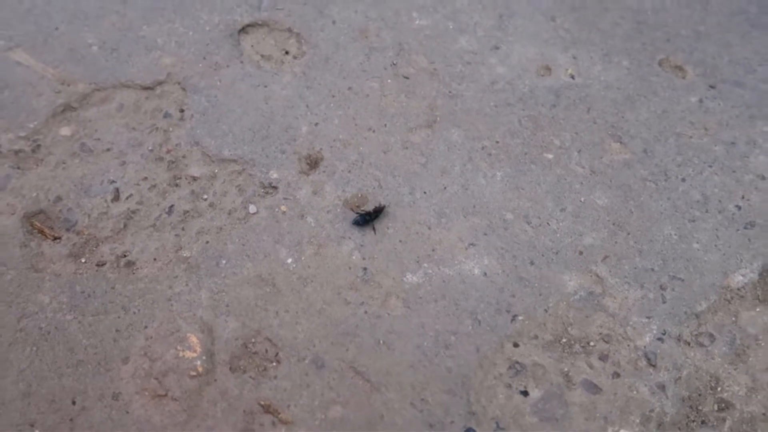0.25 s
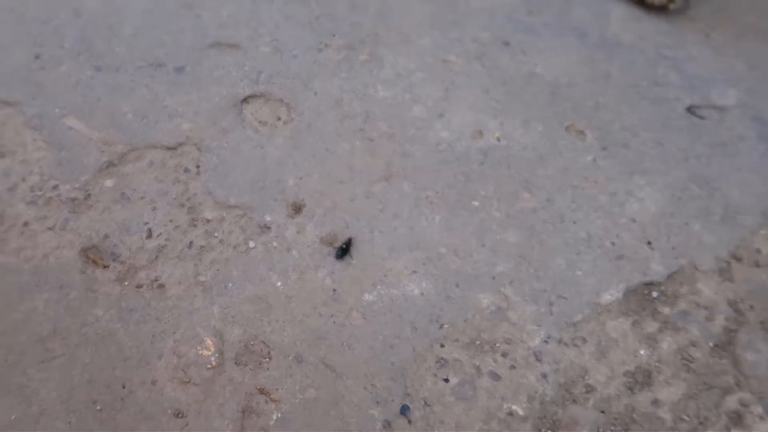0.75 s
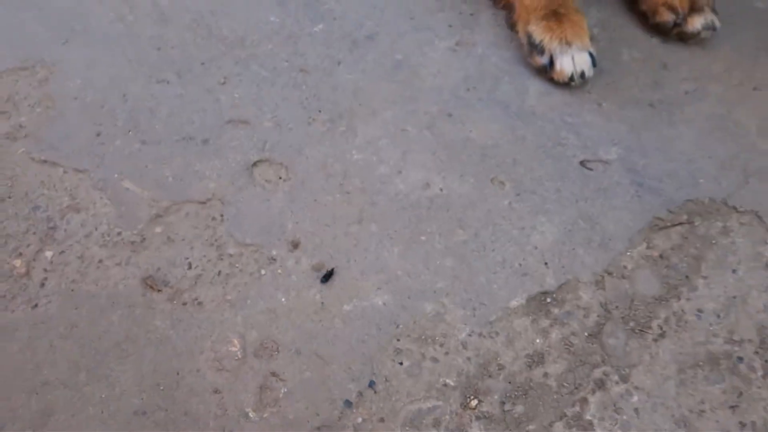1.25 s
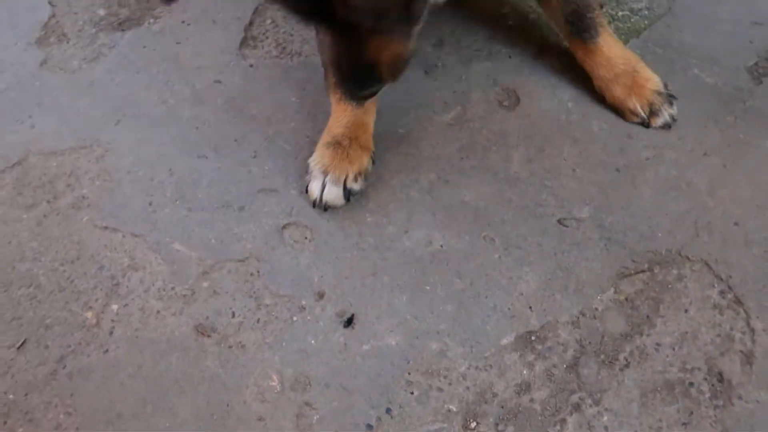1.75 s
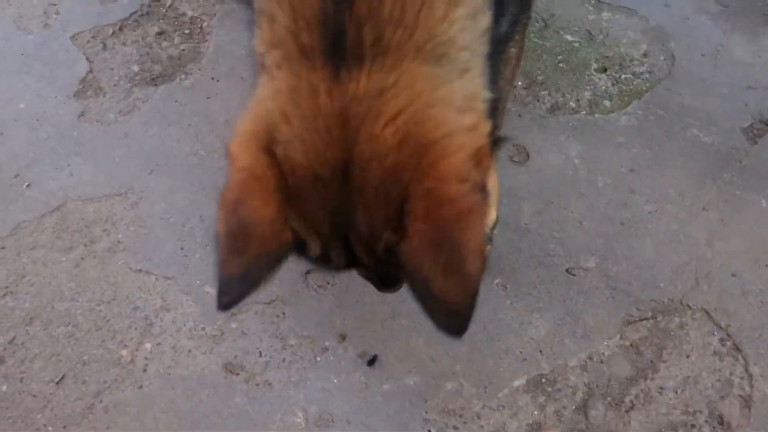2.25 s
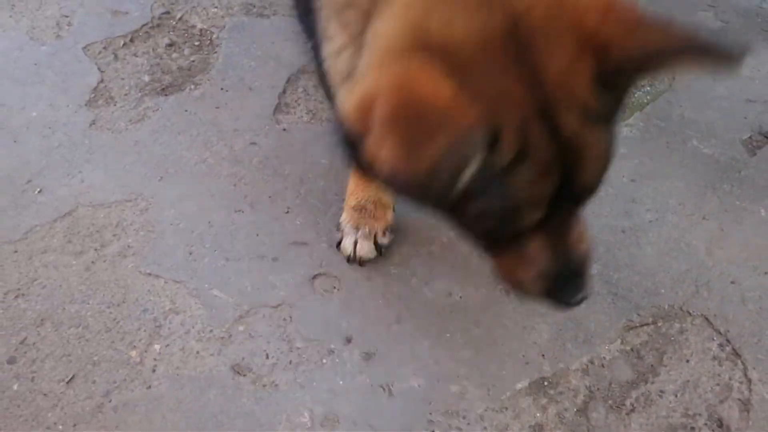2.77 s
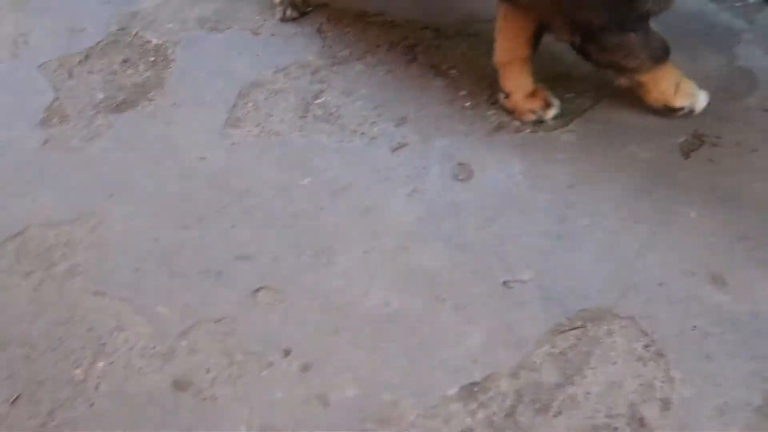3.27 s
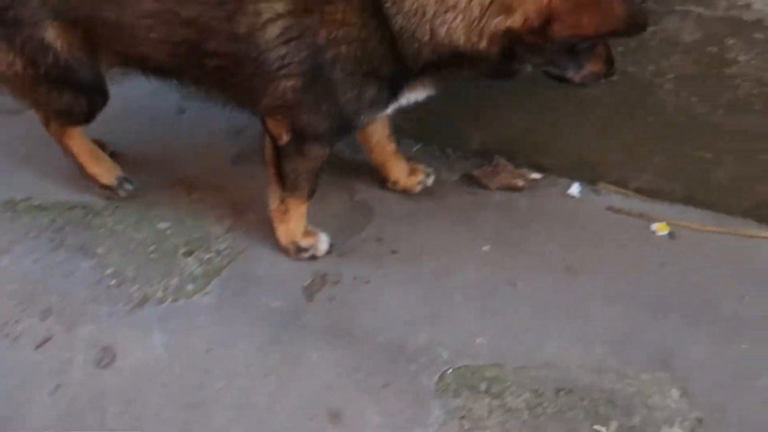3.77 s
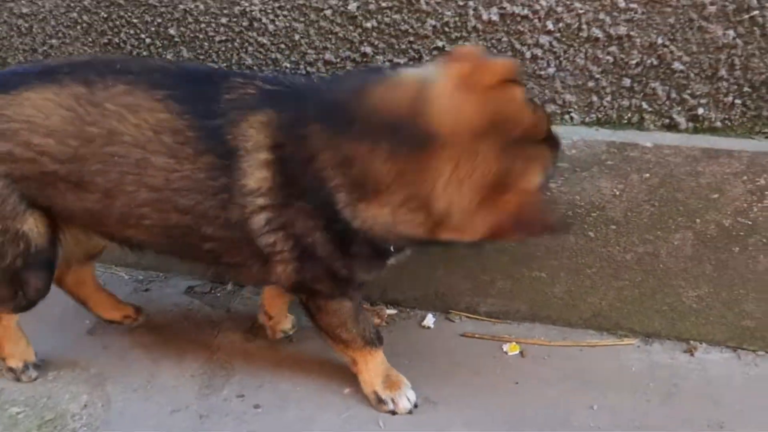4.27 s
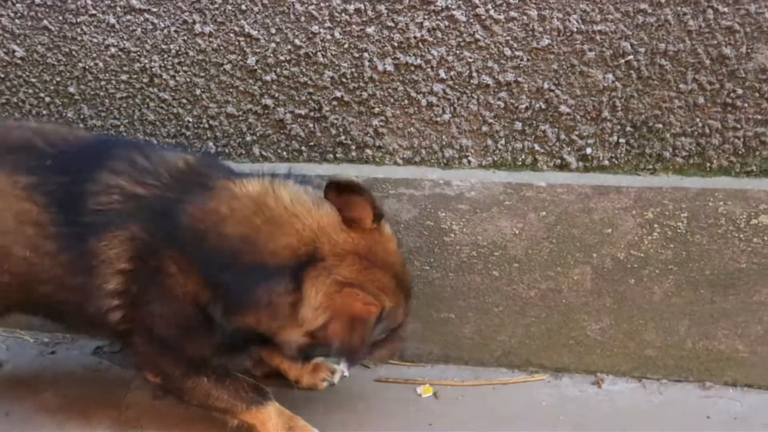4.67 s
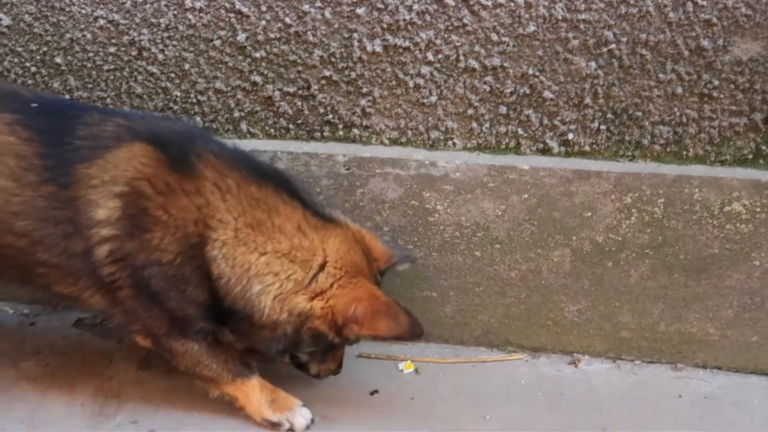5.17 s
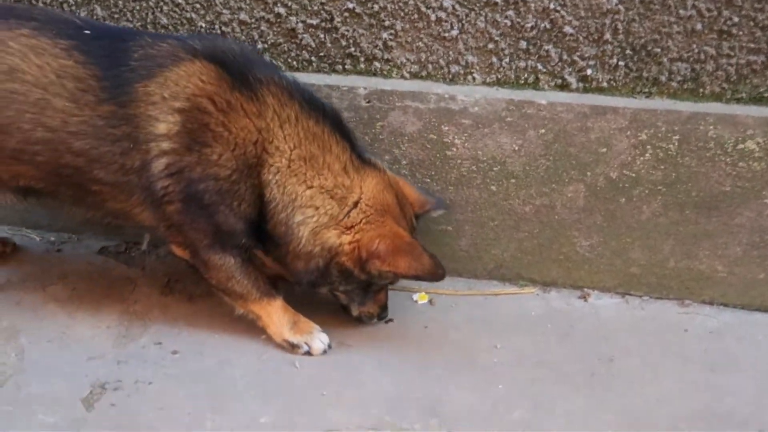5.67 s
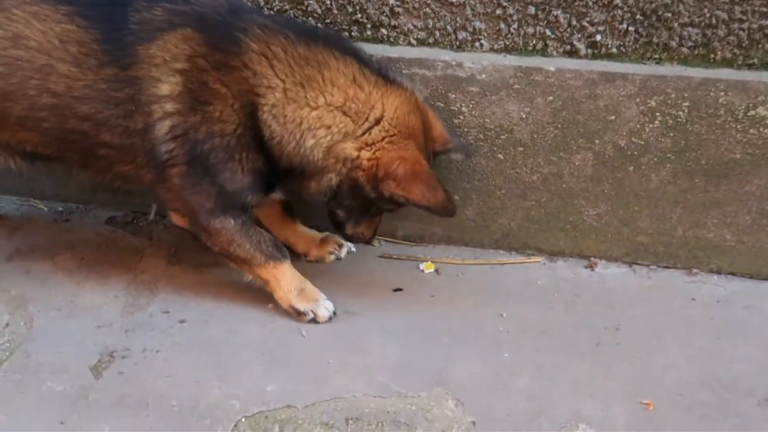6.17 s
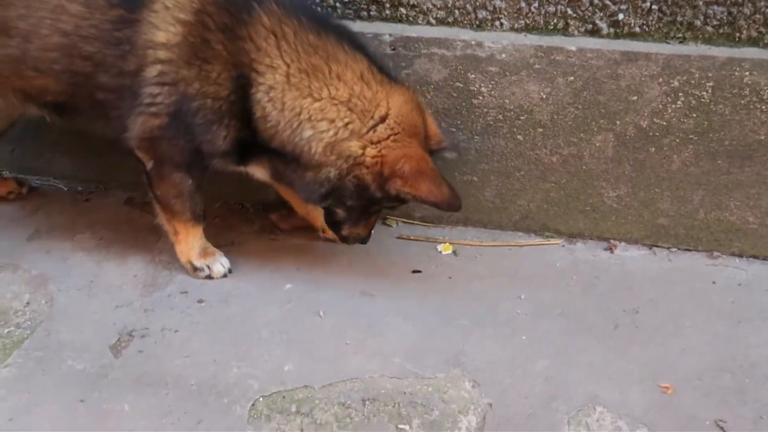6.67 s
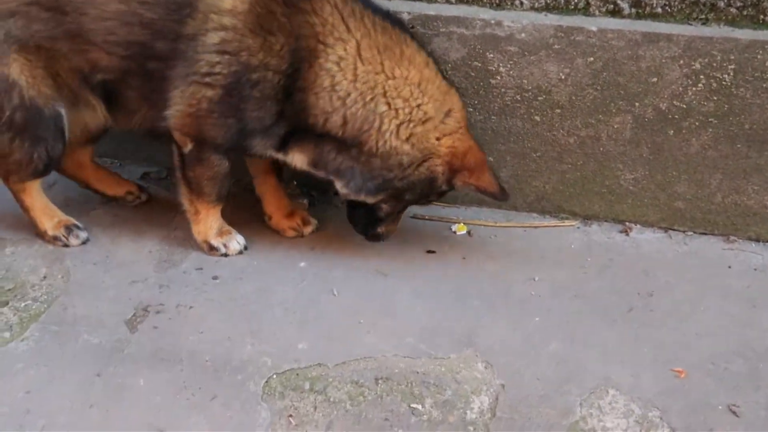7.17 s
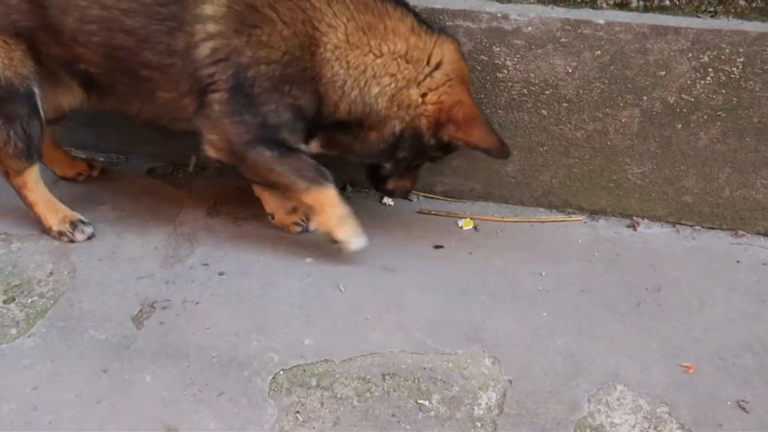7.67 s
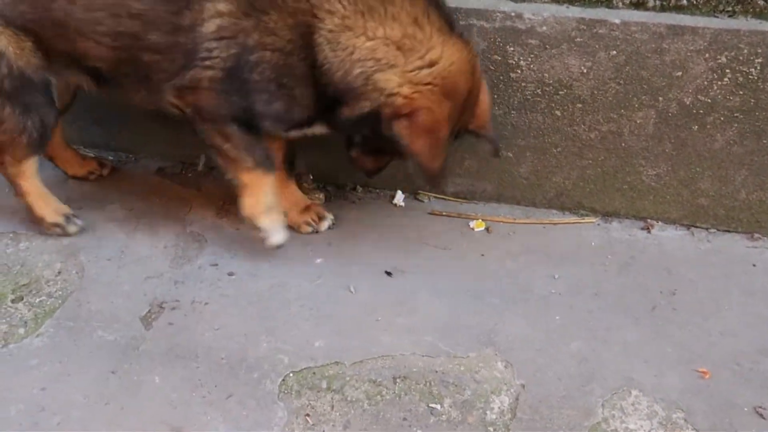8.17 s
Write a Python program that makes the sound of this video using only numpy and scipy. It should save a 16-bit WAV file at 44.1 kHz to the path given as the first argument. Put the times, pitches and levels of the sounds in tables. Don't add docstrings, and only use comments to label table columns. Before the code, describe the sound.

Steady distant traffic hum and lumpy low wind sit under a puppy's rattling, closed-mouthed grunts with a nasal snort, each about a fifth of a second. Small birds chirp from the walls around, mostly right, one whistling down at left. Light paw scuffs and claw clicks lead to a sharp clatter halfway, then quieter grunts, taps and a short scraping drag, all near and slightly echoing.

```python
import sys
import numpy as np
from scipy import signal
from scipy.fft import rfft, irfft, next_fast_len
from scipy.io import wavfile
from scipy.ndimage import uniform_filter1d, map_coordinates

SR = 44100
rng = np.random.default_rng(int(sys.argv[2]) if len(sys.argv) > 2 else 0)


def wav_out(sig):
    wavfile.write(sys.argv[1], SR, np.round(np.clip(np.atleast_2d(sig).T, -1, 1) * 32767).astype(np.int16))


def elevation(decibels):
    levels = np.asarray(decibels, float)
    return 10 ** (levels / 20)


N = 371763


def unit(x):
    return x / np.sqrt(np.mean(x ** 2) + 1e-20)


def along(points, hz):
    f, v = np.transpose(points)
    return np.interp(np.log(hz + 1), np.log(f + 1), v)


def wobble(rate):
    knots = rng.standard_normal(int(N * rate / SR) + 4)
    return map_coordinates(knots, [np.arange(N) * rate / SR])


def filtered(x, response):
    m = next_fast_len(N + SR // 2)
    return irfft(rfft(x, m) * response(np.fft.rfftfreq(m, 1 / SR)), m)[..., :N]


def resonant(x, modes):
    def response(f):
        total = 0
        for k, (centre, width, db) in enumerate(modes):
            damping = 1j * f * width
            total = total + (-1) ** k * elevation(db) * damping / (centre ** 2 - f ** 2 + damping)
        return total
    return filtered(x, response)


def gliding(x, centre_hz, width_hz):
    turn = np.exp(2j * np.pi * np.cumsum(centre_hz) / SR)
    keep = np.exp(-np.pi * width_hz / SR)
    return unit((signal.lfilter([1], np.poly([keep] * 3), x / turn) * turn).real)


def arch(u, peak, start_db, end_db, round_):
    rise = start_db * abs(1 - u / peak) ** round_
    fall = end_db * abs((u - peak) / (1 - peak)) ** round_
    return -np.where(u < peak, rise, fall)


def rush(spectrum, alike, patchy_db):
    z = signal.stft(rng.standard_normal((2, N)), nperseg=512)[2]
    field = uniform_filter1d(rng.standard_normal(z.shape[1:]), 6, 0)
    field = uniform_filter1d(field, 14, 1)
    pair = signal.istft(z * elevation(patchy_db * unit(field)), nperseg=512)[1][:, :N]

    def response(hz):
        angle = np.arccos(np.clip(along(alike, hz), -1, 1)) / 2
        return elevation(along(spectrum, hz)) * [np.cos(angle), np.sin(angle)]
    mid, side = filtered(pair, response)
    return unit(np.array([mid + side, mid - side]))


def placed(x, pan_db, lag_s):
    half = np.array([[.5], [-.5]])
    return filtered(x, lambda hz: elevation(pan_db * half) * np.exp(-2j * np.pi * hz * lag_s * half))


def yard(x, shared_hz):
    # pitch_hz, die_s
    echo_times = [(100, 0.435), (1000, 0.22), (2500, 0.3294), (12000, 0.317)]
    hz, t, z = signal.stft(rng.standard_normal((2, SR // 3)), SR, nperseg=256)
    z[1] += np.exp(-hz[:, None] / shared_hz) * (z[0] - z[1])
    tail = signal.istft(z * elevation(-60 * t / along(echo_times, hz)[:, None]), SR, nperseg=256)[1]
    tail = tail / np.linalg.norm(tail, axis=1)[:, None]
    late = np.pad(x, (250, 0))[None]
    return signal.oaconvolve(late, tail, axes=1)[:, :N]


def air():
    # peak_s, level_db, time to die by 20 dB die_s
    gust_rows = [(.09, -38.5, 0.27), (.77, -37, 0.37), (1.1, -41, 0.86), (2.49, -45.5, 1.17),
                 (3.22, -45.5, 0.06), (3.54, -33.5, 0.31), (4.18, -41.5, 0.83), (6.29, -52.5, 1.95),
                 (6.64, -42, 0.04), (7.5, -45, 0.5), (7.63, -37.5, 0.42), (8.3, -60.5, -2)]
    # pitch_hz, level_db
    push = [(8, -28), (20, -14.5), (35, 6), (48, 11), (65, -6), (100, -14.5), (200, -71)]
    # pitch_hz, level_db (per Hz)
    hum_curve = [(24, -61.5), (40, -3), (66, -1.5), (179, -9.5), (241, -7), (903, -18.5), (1220, -19),
                 (2060, -23.5), (2840, -23), (9410, -38), (11500, -39.5), (13700, -45.5), (15500, -50)]
    # pitch_hz, likeness (0 to 1)
    likeness = [(50, 1), (150, 0.816), (500, 0.468), (1200, 0.18), (3000, 0.037), (8000, 0.056),
                (15000, 0.39)]
    calm_db, rise_s = -52.5, 0.105
    t = np.arange(N) / SR
    wind = elevation(calm_db)
    for peak, db, dies in gust_rows:
        wind = wind + elevation(db - 20 * np.maximum((peak - t) / rise_s, (t - peak) / dies))
    hum = elevation(-48.5) * elevation(.6 * wobble(3)) * rush(hum_curve, likeness, patchy_db=1.1)
    lumps = elevation(0.77 * wobble(11.0)) * rush(push, [(30, .96)], patchy_db=0.9)
    return hum + elevation(-4.0) * wind * unit(lumps)


def birds(notes, swing_hz):
    out = np.zeros(N + SR)
    pace_hz = 380 + 160 * unit(wobble(70))
    flutter = .7 * np.sin(2 * np.pi * np.cumsum(pace_hz) / SR) + .28 * unit(wobble(300))
    hoarse_db = 4 * wobble(120)
    for s, length, from_hz, to_hz, db in notes:
        at = round(s * SR)
        u = np.arange(int(length * SR)) / (length * SR)
        glide = from_hz + (to_hz - from_hz) * u ** .8
        phase = 2 * np.pi * np.cumsum(glide + swing_hz * flutter[at:][:len(u)]) / SR
        swell = elevation(db + 3 + hoarse_db[at:][:len(u)]) * np.sin(np.pi * u ** 0.52) ** 0.582
        octave = elevation(-10.5 - 0.0261 * np.abs(glide - 3000))
        out[at:][:len(u)] += swell * (np.sin(phase) + octave * np.sin(phase / 2))
    return out[:N]


def sparrows():
    # start_s, length_s, from_hz, to_hz, level_db
    hoarse = [(0, 0.0453, 2230, 2449, -43.5), (0, 0.0546, 4090, 3329, -44.5),
              (.105, 0.0448, 2297, 3007, -45), (.17, 0.096, 2829, 2524, -50), (1.16, 0.06, 4880, 4510, -57),
              (1.19, 0.0985, 4100, 3634, -50.5), (1.42, 0.129, 2682, 2500, -55),
              (1.47, 0.0603, 4676, 3944, -55.5), (1.51, 0.083, 3171, 2846, -48.5),
              (1.858, 0.0486, 4622, 4140, -41), (1.92, 0.0593, 4122, 3610, -46),
              (2.14, 0.0513, 4490, 3495, -48), (2.265, 0.0275, 2697, 2681, -49),
              (2.19, 0.104, 2950, 2567, -56.5), (2.385, 0.065, 3500, 3124, -57.5),
              (2.43, 0.0534, 2910, 2626, -54.5), (3.28, 0.036, 3358, 3037, -59),
              (3.635, 0.0402, 3105, 3586, -44.5), (3.665, 0.0666, 3501, 2719, -44),
              (5.43, 0.0442, 4110, 3460, -37), (5.6, 0.08, 4365, 3940, -54), (6.28, 0.048, 3286, 2979, -61),
              (6.42, 0.068, 4516, 3914, -46), (6.8, 0.0894, 1580, 1350, -63),
              (.03, 0.13, 4265, 3267, -62.5), (1.17, .08, 5290, 4240, -61), (6.79, 0.134, 3200, 2975, -56),
              (6.93, 0.065, 3274, 3018, -53.5), (8.352, 0.049, 4138, 3486, -51.5),
              (8.355, 0.038, 3120, 2830, -52), (8.342, 0.0358, 2198, 1693, -53.5),
              (1.27, 0.056, 4430, 3484, -56), (2.895, 0.0301, 3685, 3267, -60),
              (2.25, 0.038, 4200, 3705, -59.5), (.16, 0.096, 3690, 3426, -60),
              (2.15, .04, 2292, 2072, -52.5)]
    # start_s, length_s, from_hz, to_hz, level_db
    clear = [(.108, 0.029, 4140, 4896, -52), (1.105, 0.095, 2790, 2607, -60),
             (7.21, 0.0725, 3130, 2790, -63.5), (1.26, 0.0306, 2876, 2704, -54),
             (1.98, 0.057, 3406, 2760, -54), (5.35, 0.046, 2590, 2742, -62), (3.07, 0.047, 3280, 2846, -61),
             (5.01, 0.0236, 3425, 2798, -54), (5.19, 0.062, 3495, 2694, -62),
             (5.378, 0.0387, 3500, 4223, -46.5), (5.4, 0.0342, 4595, 5370, -43),
             (5.428, 0.0144, 5210, 3598, -48.5), (5.48, 0.0263, 3254, 3107, -43.5),
             (1.895, 0.067, 3585, 3510, -44), (2.15, 0.069, 3495, 2646, -49.5),
             (5.63, 0.0904, 3315, 2411, -45), (6.11, 0.05803, 3520, 2601, -64),
             (6.36, 0.034, 4150, 4045, -50.5), (6.385, 0.044, 5300, 4344, -45),
             (6.77, 0.085, 4470, 3850, -56.5), (7.98, 0.0363, 3508, 2806, -58),
             (8.18, 0.041, 3618, 2865, -56.5)]
    # start_s, length_s, from_hz, to_hz, level_db
    thin = [
        (1.4, 0.097, 3100, 3390, -60.5),
        (1.41, 0.087, 4400, 4400, -61),
        (3.465, .035, 3200, 2950, -69),
        (5.93, 0.0395, 3020, 2900, -60.5),
        (6.845, 0.083, 3500, 3434, -55),
        (6.835, 0.0699, 2850, 2607, -53.5),
        (6.49, 0.0522, 3100, 2700, -61.5),
    ]
    return birds(hoarse, swing_hz=477.6) + birds(clear, swing_hz=264) + birds(thin, swing_hz=90)


def grunts():
    # start_s, length_s, effort_db, pulse_hz, nose_db
    grunt_rows = [(0.027, 0.2157, -36.5, 55.73, -47.5), (0.589, 0.2374, -32, 43.03, -35),
                  (1.051, 0.2178, -33.5, 40.12, -39), (1.496, 0.267, -35, 37.43, -47),
                  (2.391, 0.221, -33, 39.5, -43), (2.617, 0.186, -40.5, 36.59, -51.5),
                  (2.821, 0.1896, -35, 41.53, -46), (3.158, 0.1655, -35.5, 37.82, -47.5),
                  (3.463, 0.2047, -34, 40.72, -42.5), (3.758, 0.1715, -39.5, 40.02, -49.5),
                  (4.152, 0.1836, -38, 37.06, -51.5), (5.101, 0.276, -38, 37.29, -53.5),
                  (5.75, 0.244, -43.5, 36.47, -63.5), (6.599, 0.197, -42.5, 37.78, -57),
                  (7.178, 0.216, -40, 35.91, -55), (7.976, 0.145, -44, 39.11, -60.5)]
    # open_s, nose_hz, extra throat level throat_db
    nostrils = [(.085, 1140, 2), (.627, 1202, -4.5), (1.092, 1188, -1.5), (1.55, 1229, -1.5),
                (2.413, 1153, 0), (2.648, 1169, -1), (2.875, 1119, 0.5), (3.194, 1166, 1),
                (3.497, 1051, -2), (3.8, 1096, 3), (4.215, 1156, 2.5), (5.152, 1170, -2),
                (5.777, 1165, -0.5), (6.688, 1152, -0.5), (7.237, 1129, -1.5), (8.019, 1156, 0.5)]
    # share by which the pulse starts high, palate_db, low_throat_db
    voices = [(.3, -63, -51), (.15, -62, -52), (.15, -69.5, -47.5), (0.0202, -61, -53.5),
              (0.1203, -62.5, -51), (0.0795, -57, -47), (0.0494, -65, -44.5), (0.1509, -63.5, -63.5),
              (.2, -53, -58.5), (.15, -60.5, -50), (0.1488, -65.5, -60), (0.0099, -55, -68.5),
              (0.0108, -55.5, -59.5), (0.0097, -55, -63), (0.0102, -56.5, -56.5), (0.0098, -54, -55)]
    # centre_hz, width_hz, level_db
    chest_modes = [(75.33, 12.07, 3), (119.6, 17, -4.5), (160.6, 23, -6.5)]
    # centre_hz, width_hz, level_db
    dull = [(306, 271.5, 1)]
    # centre_hz, width_hz, level_db
    mouth_shut = [(201.5, 52.2, 4), (273.6, 35.7, -11), (617.3, 107, -6), (719, 95, -9.5)]
    # centre_hz, width_hz, level_db
    mouth_open = [(287.1, 66.9, 0.5), (399.2, 55.2, -5.5), (556, 126.5, -10.5), (694.3, 89.3, -8),
                  (921, 208, -11.5)]

    t = np.arange(N) / SR
    rows = np.array(grunt_rows)
    which = np.maximum(np.searchsorted(rows[:, 0], t) - 1, 0)
    start, length, effort_db, steady_hz, nose_db = rows[which].T
    opens, nose_hz, more_db = np.array(nostrils)[which].T
    sag, palate_db, low_db = np.array(voices)[which].T
    since = t - opens
    u = np.clip((t - start) / length, 0, 1)
    gate = uniform_filter1d(((u > 0) & (u < 1)) * 1., size=600)

    rate_hz = steady_hz * (1 + sag * np.exp(-np.maximum(since, 0) / .06))
    cycle = np.cumsum(rate_hz * (1 + .025 * wobble(30))) / SR
    cycle -= cycle[(opens * SR).astype(int)]
    slaps = (np.diff(np.floor(cycle), prepend=0) == 1) * elevation(1.7 * wobble(40))
    flaps = (np.diff(np.floor(cycle + 0.36), prepend=0) == 1) * elevation(3.18 * wobble(40))
    puff = unit(np.exp(-3 * (cycle % 1)) * rng.standard_normal(N))

    def voice(flap, leak):
        return unit(slaps + flap * flaps) * (1 - leak) - leak * puff

    def twice(x, mode):
        return unit(resonant(resonant(x, mode), mode))

    chest = unit(resonant(resonant(voice(0.465, 0.069), chest_modes), [(100, 98, 0)]))

    strain_db = effort_db + 35.5
    mouth = np.clip(0.439 + 0.939 * u, 0, 1)
    throat = resonant(voice(.5, np.clip(.36 + .03 * strain_db, .15, .5)), dull)
    throat = (np.sqrt(1 - mouth) * unit(resonant(throat, mouth_shut))
              - np.sqrt(mouth) * unit(resonant(throat, mouth_open)))
    palate = elevation(palate_db) * twice(voice(0.16, 0.093), [(693.6, 112, 0)])
    low_throat = elevation(low_db) * twice(voice(0.48, 0.17), [(203.85, 45, 0)])
    throat_db = -39 + more_db + 0.683 * strain_db
    throat = elevation(throat_db) * throat + elevation(1.5) * (palate + low_throat)
    body = elevation(effort_db + arch(u, 0.501, 16.8, 16.7, 1.67)) * chest
    body = body + elevation(arch(u, 0.43, 13.3, 14.13, 1.58)) * throat

    nose_centre_hz = nose_hz * (1 + 0.0244 * wobble(25) + 0.023 * (2 * u - 1))
    nose = gliding(voice(.4, .55), nose_centre_hz, 140)
    nose += elevation(-9.5) * gliding(voice(.4, .75), 1350 + 450 * u, 300)
    choke_db = -12 * np.exp(-np.abs(since) / .07) * (cycle % 1) ** 2
    nose = unit(nose * uniform_filter1d(elevation(choke_db), size=200))
    late = since - 0.0293
    shut_db = 9 * (since < 0)
    nose_db = nose_db - 2.0 - shut_db - np.maximum(124.5 * late, -194.5 * late)
    return gate * body, gate * uniform_filter1d(elevation(nose_db), size=90) * nose


def knocks():
    # start_s, peak_db, ring_hz, clatter_db (over the peak)
    thuds = [(.5, -29.5, 248.7, -45.5), (3.455, -28, 109.5, -39.5), (3.524, -21, 88.4, -30),
             (4.324, -22, 328, -18), (4.336, -12.5, 232.3, -27), (4.394, -26.5, 266.7, -9),
             (4.495, -26.5, 229.6, -26.5), (4.516, -20.5, 192, -20.5), (5.6, -31.5, 206.3, -19.5),
             (7.417, -26, 183.6, -34.5), (7.634, -40, 51.3, -36.5), (3.679, -39.5, 100, -30),
             (3.704, -35, 100, -32.5), (4.093, -43, 251, -9.5)]
    # start_s, peak_db, ring_hz, clatter_db (over the peak)
    taps = [(.504, -36, 816, -7), (2.059, -48, 1286, 3), (2.789, -42, 1230, -3.5), (2.875, -38, 930, -7),
            (3.596, -39, 1050, 5), (2.156, -43, 1680, -11), (5.915, -46.5, 1480, -12),
            (4.031, -44, 1790, -9), (7.918, -46, 1400, -14), (4.333, -30.5, 1800, -30),
            (4.355, -37, 1640, -17), (4.43, -45, 1100, 1), (4.52, -40, 1770, -20), (4.601, -23, 620, -13),
            (6.955, -31, 605, -15), (6.974, -31, 593, -10), (8.329, -41, 2110, -9), (.153, -43, 1350, -19),
            (3.857, -48, 1520, -19), (6.808, -48, 1000, -9), (4.617, -39, 1000, -19), (.172, -41, 600, -19),
            (6.045, -47, 620, -6), (6.085, -48, 680, -5), (6.132, -48, 500, -5), (6.163, -48, 520, -6),
            (7.675, -46, 700, -12), (4.565, -31, 800, -20), (4.578, -34, 1400, -20)]
    # ring_hz, level_db, time to die by 60 dB die_s
    blow_modes = [(532.7, 2.5, 0.0302), (943, -7, 0.0263), (1603, -8, 0.031), (2400, -13, 0.025)]
    # pitch_hz, level_db
    clatter = [(100, -5), (500, 7), (1000, 3), (1700, -2.5), (2600, -10), (4000, -29), (15000, -59.5)]
    out, t = np.zeros(N + SR), np.arange(SR // 3) / SR
    rattle = rush(clatter, [(100, 1)], patchy_db=.6)[0] * elevation(2.5 * wobble(120))
    clatter_s = 0.134
    hits = [(s, db, hz, 11.1 / hz, db + more, clatter_s) for s, db, hz, more in thuds]
    hits += [(s, db, hz, 0.064, db + more, clatter_s) for s, db, hz, more in taps]
    hits += [(4.542, -13 + db, hz, die_s, -33 + db, 0.2) for hz, db, die_s in blow_modes]
    for s, db, hz, ring_s, clatter_db, fade_s in hits:
        at = round(s * SR)
        ring = -np.sin(2 * np.pi * hz * t) * elevation(-60 * t / ring_s) * (1 - np.exp(-t * hz * 7.05))
        fade = elevation(-60 * t / fade_s) + 0.68 * elevation(-60 * t / 0.0048)
        out[at:][:len(t)] += elevation(db) * ring + elevation(clatter_db) * fade * np.resize(rattle[at:], len(t))
    return out[:N]


def claws():
    # start_s, peak_db, centre_hz
    tick_rows = [(.417, -41, 4780), (.438, -53, 2520), (2.425, -48, 2840), (2.48, -46, 2880),
                 (2.79, -39.5, 2620), (2.875, -44, 2570), (2.954, -47, 4200), (2.984, -53, 2550),
                 (3.199, -47, 3250), (4.024, -48, 2730), (4.033, -45, 2600), (4.037, -46, 4200),
                 (4.305, -34, 4670), (4.411, -40, 2930), (4.444, -49, 2820), (4.76, -34, 4800),
                 (4.828, -49, 4580), (7.026, -37, 2980), (7.462, -49, 4800), (5.153, -44, 2100),
                 (5.182, -49, 1900), (8.26, -56, 3200), (8.33, -33, 2890)]
    out, t = np.zeros(N + SR), np.arange(600) / SR
    for s, db, hz in tick_rows:
        ring = np.sin(2 * np.pi * hz * t) * elevation(-60 * t / 0.00427)
        noise = rng.standard_normal(len(t)) * elevation(-60 * t / 0.015)
        out[round(s * SR):][:len(t)] += elevation(db) * (1.8 * ring + 0.334 * noise)
    return out[:N]


def paws():
    # start_s, peak_db, drag_s
    scuff_rows = [(.612, -49, .045), (1.853, -48.5, 0.03), (2.15, -52, 0.0264), (2.427, -52, 0.0136),
                  (2.477, -45.5, 0.0154), (2.58, -55.5, 0.0166), (2.954, -53, 0.013), (3.113, -53, 0.047),
                  (3.164, -43.5, 0.0382), (3.585, -47.5, 0.0266), (3.637, -50.5, 0.032), (3.88, -57, 0.012),
                  (4.333, -41, 0.0472), (4.438, -50, 0.012), (4.508, -47.5, 0.035), (4.64, -50, 0.0253),
                  (4.737, -49.5, 0.023), (5.9, -53, 0.032), (6.005, -53, 0.0576), (6.061, -51.5, 0.073),
                  (6.974, -47.5, 0.0095), (7.025, -42, 0.022), (7.459, -63.5, 0.03325), (7.9, -54, 0.024),
                  (3.09, -54.5, 0.0203), (7.925, -47.5, 0.0323), (7.954, -51.5, 0.021),
                  (8.26, -51.5, 0.024), (8.329, -44, 0.0194), (8.352, -60, 0.033), (4.02, -63.5, 0.018)]
    # pitch_hz, level_db (per Hz)
    grit = [(880, -13), (1500, -7.5), (1670, -17), (2170, -10.5), (3950, -8.5), (8460, -15.5), (12100, -19),
            (15500, -33.5)]
    pressure, u = np.zeros(N + SR), np.arange(SR // 4) / SR
    for s, db, length in scuff_rows:
        rise_s = 0.084 * length
        fade_s = 0.087 + 2.3 * length
        fade = elevation(db - 60 * np.maximum(u - length, 0) / fade_s)
        pressure[round(s * SR):][:len(u)] += fade * np.minimum(u / rise_s, 1)
    grains = rush(grit, [(2000, 0.8), (12000, 0.38)], patchy_db=-1.0) * elevation(1.78 * wobble(350))
    return pressure[:N] * elevation(-6.0) * unit(grains)


def left_bird():
    # start_s, length_s, from_hz, to_hz, level_db
    whistle = [
        (1.675, 0.0365, 6485, 4880, -60),
        (1.7, 0.08, 5110, 3122, -54),
        (1.768, 0.04, 3452, 3255, -47),
        (1.772, 0.0382, 2907, 2702, -47.5),
    ]
    return birds(whistle, swing_hz=90)


def snaps():
    # start_s, peak_db
    snap_rows = [(2.4271, -50), (2.4813, -46), (2.5806, -48.5), (2.9537, -49), (2.9628, -46.5),
                 (2.9826, -46.5), (3.1635, -34), (3.1744, -34.5), (3.1865, -35), (3.1994, -43),
                 (3.8826, -52), (4.335, -38), (4.4418, -48), (4.5106, -44), (4.5264, -49), (6.974, -49),
                 (7.0251, -41), (7.0394, -41), (7.6166, -52.5), (7.9252, -44.5), (7.9394, -55.5),
                 (7.9553, -43.5), (8.2602, -42), (8.2633, -47.5), (8.27, -47), (8.3296, -39.5),
                 (8.3367, -36)]
    out, t = np.zeros(N + SR), np.arange(500) / SR
    for s, db in snap_rows:
        out[round(s * SR):][:len(t)] += elevation(db + 3.0 - 60 * t / 0.0134) * rng.standard_normal(len(t))
    bright = [(8000, 8500, 0)]  # Hz, width Hz, dB
    return resonant(resonant(out[:N], bright), bright)


def drag():
    # time_s, level_db
    drag_path = [
        (7.4, -55.5),
        (7.408, -48.5),
        (7.48, -45.5),
        (7.51, -34.5),
        (7.54, -32.5),
        (7.585, -42),
        (7.61, -40),
        (7.64, -45.5),
        (7.7, -57.5),
    ]
    # centre_hz, width_hz, level_db
    hollow = [(155.2, 49.5, 1), (240.5, 153, -5), (467.7, 58, -3), (739, 108, -11.5), (988, 169, -15.5),
              (1410, 247, -23.5)]
    t = np.arange(N) / SR
    times, levels_db = np.transpose(drag_path)
    gate = uniform_filter1d(((t > times[0]) & (t < times[-1])) * 1., size=600)
    slips = rng.standard_normal(N) * elevation(2.5 * wobble(140))
    return gate * elevation(np.interp(t, times, levels_db)) * unit(resonant(slips, hollow))


def scene():
    right = sparrows()
    left = left_bird()
    body, nose = grunts()
    blows = filtered(knocks(), lambda hz: 1 / (1 + 1j * hz / 4500) ** 2)
    dog = body + drag() + claws()
    to_walls = dog + elevation(-3.5) * nose + elevation(-4) * blows
    to_walls = filtered(to_walls, lambda hz: hz / (hz + 100))
    near = placed(dog + nose + blows, pan_db=-0.38, lag_s=.00005)
    near = near + elevation(-3.0) * yard(to_walls, shared_hz=1400)
    far = placed(elevation(0.42) * right + yard(right, shared_hz=6740) * elevation(1.0), pan_db=-3.5, lag_s=.00007)
    far += placed(left + elevation(-1.5) * yard(left, shared_hz=7000), pan_db=0.5, lag_s=-0.0000588)
    return near + far + paws() + placed(snaps(), pan_db=-0.25, lag_s=.00003) + air()


def band_limit(x):
    return signal.sosfilt(signal.butter(12, 15650, fs=SR, output="sos"), x)


def record(dry):
    mix = filtered(dry, lambda hz: np.clip((15650 - hz) / 600, 0, 1))
    return band_limit(mix)


dry = scene()
out = record(dry)
wav_out(out)
```